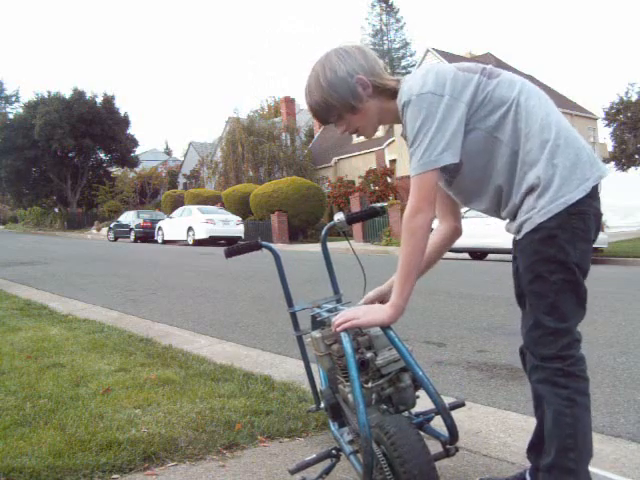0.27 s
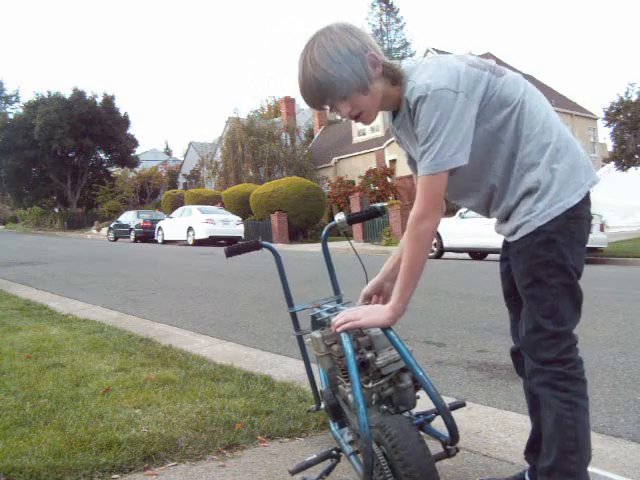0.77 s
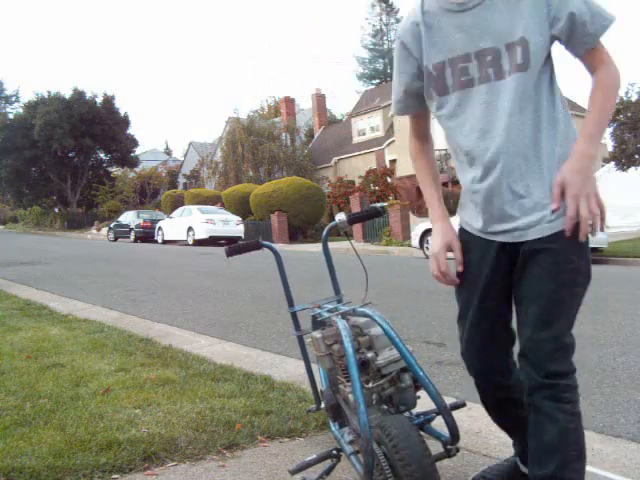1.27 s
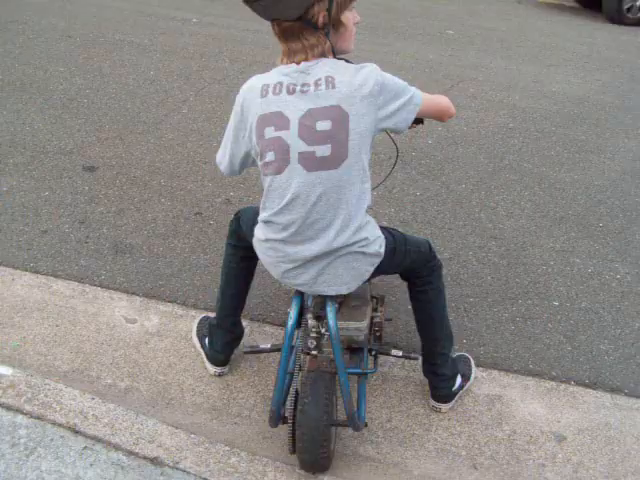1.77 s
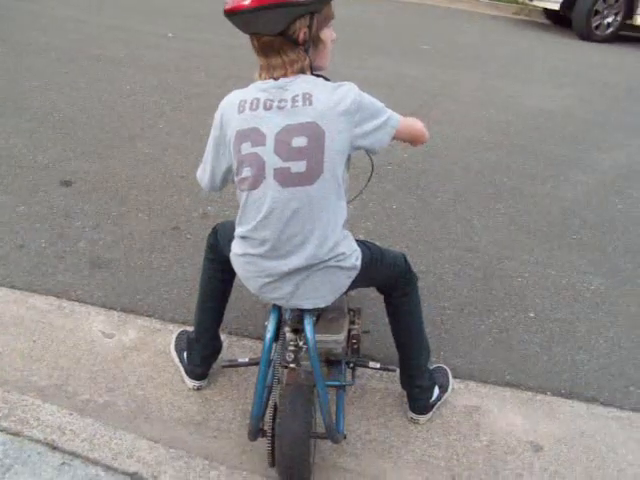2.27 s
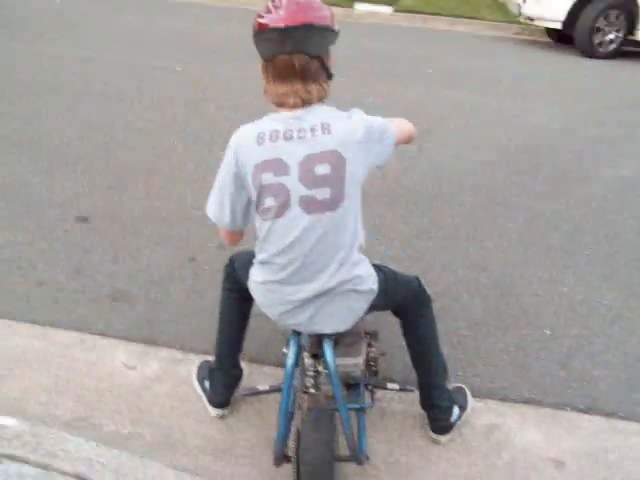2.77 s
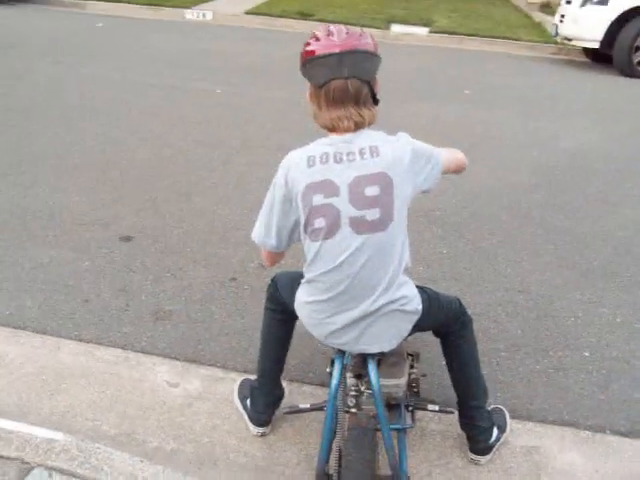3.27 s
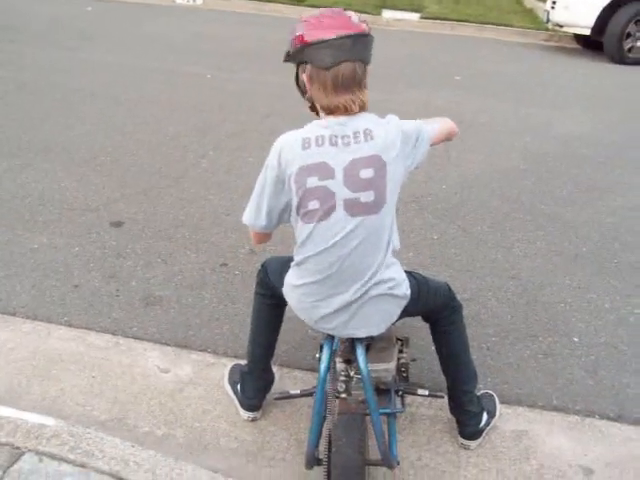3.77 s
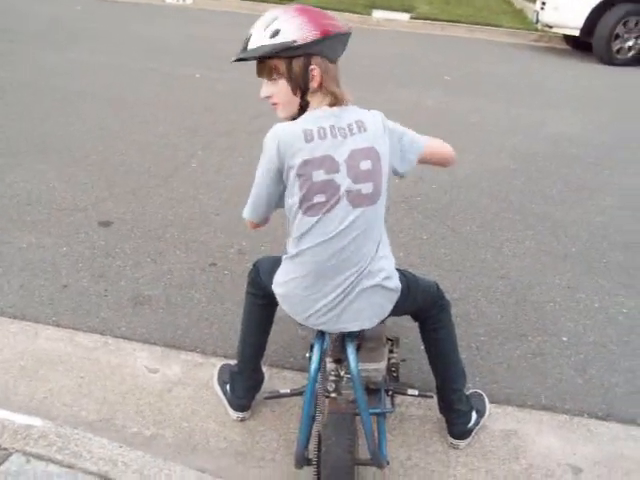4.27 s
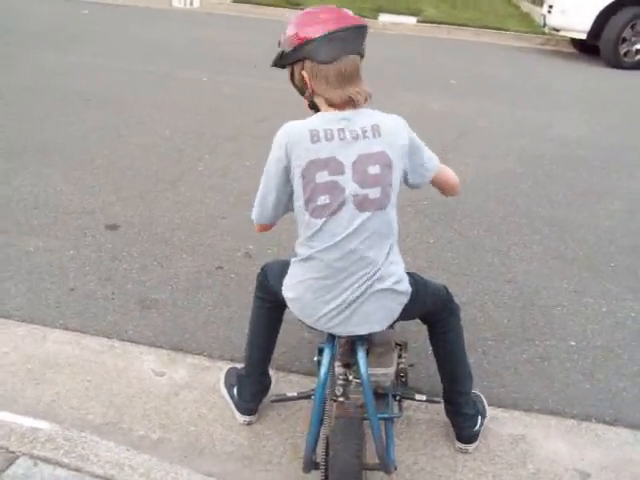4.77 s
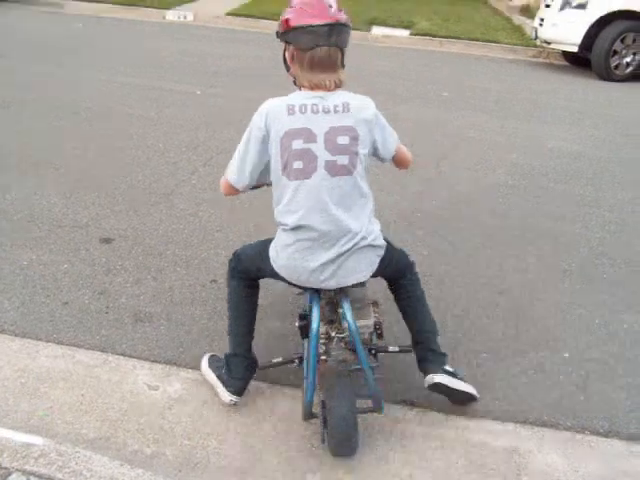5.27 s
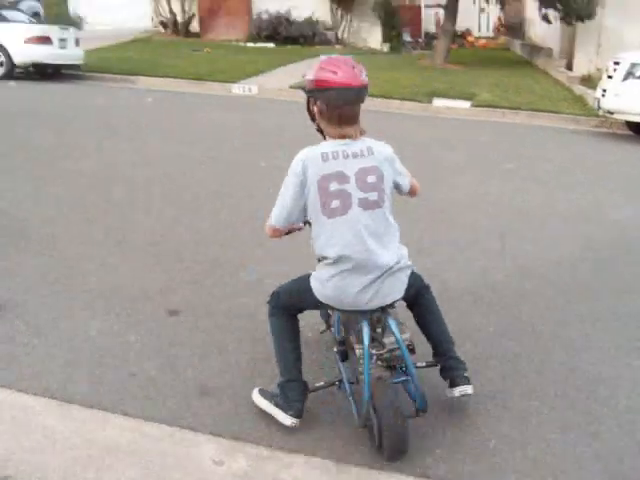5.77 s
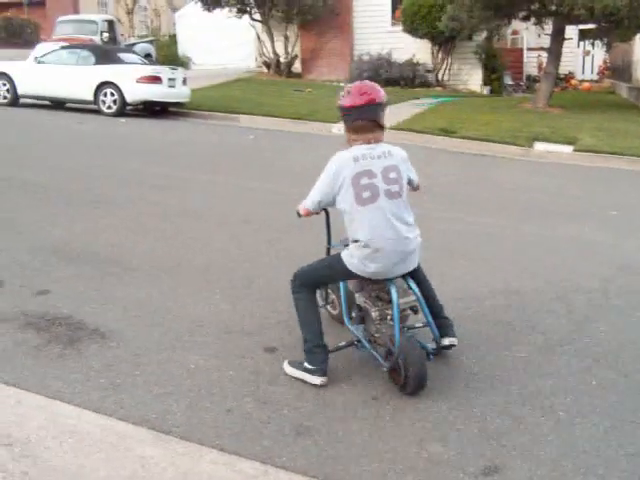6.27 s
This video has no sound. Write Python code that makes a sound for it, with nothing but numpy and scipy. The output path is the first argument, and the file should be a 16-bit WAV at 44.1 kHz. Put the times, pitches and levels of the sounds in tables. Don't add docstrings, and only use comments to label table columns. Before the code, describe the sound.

A little motorbike engine chugs beside the microphone, each beat a thump, crack and hiss of gas over clattering metal. It runs down, knocks and dies. Total silence for a moment, then a raspy idle heard from behind, rising revs, a weak beat or two, and a popping departure along the road. Gritty, compressed, dull-topped sound.

```python
import sys
import numpy as np
from scipy import signal
from scipy.fft import rfft, irfft, next_fast_len
from scipy.io import wavfile

SR = 44100
rng = np.random.default_rng(int(sys.argv[2]) if len(sys.argv) > 2 else 0)


def wrap_up_sound(samples):
    columns = np.atleast_2d(samples).T
    tamed = np.clip(columns, -1, 1)
    steps = np.round(tamed * 32767).astype(np.int16)
    wavfile.write(sys.argv[1], SR, steps)


def to_linear_factor(level_db):
    exponent = np.asarray(level_db, float) / 20
    return 10 ** exponent


N = 287973
TIME = np.arange(N) / SR


def rms_one(x):
    return x / np.sqrt(np.mean(x ** 2) + 1e-20)


def in_time(rows, s=TIME):
    at, *columns = np.transpose(rows)
    return [np.interp(s, at, column) for column in columns]


def add(out, start_s, piece):
    i = min(round(start_s * SR), N)
    out[max(i, 0):i + len(piece)] += piece[max(-i, 0):N - i]


def colour(x, spectrum):
    hz, level_db = np.transpose(spectrum)
    size = next_fast_len(len(x))
    log_hz = np.log(np.fft.rfftfreq(size, 1 / SR) + 1)
    gain = to_linear_factor(np.interp(log_hz, np.log(hz), level_db, left=-80, right=-80))
    return irfft(rfft(x, size) * rms_one(gain), size)[:len(x)]


def resonances(x, peaks):
    out = 0
    for k, (hz, width_hz, level_db) in enumerate(peaks):
        r = np.exp(-np.pi * max(width_hz, 5) / SR)
        poles = [1, -2 * r * np.cos(2 * np.pi * hz / SR), r * r]
        ringing = signal.lfilter([1, 0, -1], poles, x)
        out = out + (-1) ** k * to_linear_factor(level_db) * (1 - r * r) * ringing
    return rms_one(out)


def grains(per_s, spread_db):
    sizes = to_linear_factor(spread_db * np.minimum(rng.exponential(1, N), 4)) * rng.standard_normal(N)
    return rms_one(sizes * (rng.random(N) < per_s / SR) + 1e-9)


def flutter(rate_hz):
    band = signal.butter(2, [0.23 * rate_hz, rate_hz], "band", fs=SR, output="sos")
    return rms_one(signal.sosfilt(band, rng.standard_normal(N)))


def puff(rise_s, fall_s):
    t = np.arange(round(8 * (rise_s + fall_s) * SR)) / SR
    shape = (1 - np.exp(-(t / rise_s) ** 2)) * np.exp(-t / fall_s)
    return shape / shape.max()


def swell(width_s, rise_share):
    t = np.arange(-3 * width_s, 3 * width_s, 1 / SR)
    width = width_s * np.where(t < 0, rise_share, 1)
    return t[0], np.exp(-.5 * (t / width) ** 2)


# start and end in seconds, jet lead before the thump in cycles,
# jet width in cycles, crack width in seconds, valve delay after the thump in cycles.
VIEWS = [
    (0, 1.79, 0.13, 0.077, 0.0039, 0.23),
    (2.088, 4.77, 0.16, 0.068, 0.0015, 0.26),
    (4.77, 6.53, 0.17, 0.11, 0.0026, 0.43),
]


def by_view(make):
    out = np.zeros(N)
    for k, (start, end, *_) in enumerate(VIEWS):
        part = slice(round(start * SR), min(N, round(end * SR)))
        out[part] = make(k, part)
    return out


def view_at(s):
    return (s > VIEWS[0][1] + .1).astype(int) + (s > VIEWS[2][0])


# time of a beat in seconds, slowing as a share over the stretch ending
CRANK = [(.0098, 0), (0.6457, .05), (1.0658, .11), (1.472, .19), (1.614, 0), (2.096, 0), (2.8055, .055),
         (3.509, -.046), (4.061, -.14), (4.8039, .043), (5.169, -.095), (6.118, .001), (6.5183, .036)]
CYCLES = [11, 6, 4, 1, 1, 9, 9, 10, 13, 8, 22, 9]


def beat_times():
    at = [CRANK[0][0]]
    for (start, _), (end, slowing), count in zip(CRANK, CRANK[1:], CYCLES):
        u = np.arange(1, count + 1) / count
        at.extend(start + (end - start) * (u + slowing * u * (u - 1)))
    return np.array(at)


# time in seconds, early gas jet in dB, crack in dB.
THROTTLE = [(0, -14, -15.5), (.65, -13, -13), (1.25, -14.5, -10.5), (1.61, -5.5, -22), (2.1, -16, -10.5),
            (2.4, -9, -12.5), (3.2, -5, -23), (3.45, -4, -9.5), (3.95, -5, -17), (4.05, -20, -15.5),
            (4.5, -21.5, -15), (4.75, -6.5, -2), (4.95, -7.5, -8), (5.3, -14, -9.5), (5.8, -13.5, -11.5),
            (6.2, -17, -7.5), (6.53, -15.5, -8.5)]
# time in seconds, thump change in dB.
MISFIRES = [
    (4.061, -13),
    (4.689, -11),
]
VALVE_DB = [-13, -18, -40]
SCATTER_DB = [1.0, 2.0, 1.8, 3.5]
JITTER_S = [.001, .0012, .0003]


def beats():
    at = beat_times()
    view = view_at(at)
    chance = np.clip(rng.standard_normal((len(at), 5)), -1.4, 1.4)
    weak_db = sum(db * (np.abs(at - s) < .02) for s, db in MISFIRES)
    means = [in_time(PIPE, at)[0] + weak_db, *in_time(THROTTLE, at), np.array(VALVE_DB)[view]]
    levels_db = np.transpose(means) + chance[:, :4] * SCATTER_DB
    return at + chance[:, 4] * np.array(JITTER_S)[view], levels_db


# frequency in Hz, level in dB per Hz.
RUMBLE = [(15, -54.5), (25, 4), (43, -17), (123, -3), (167, -4.5), (255, -5), (358, -11.5), (450, -10),
          (580, -48.5), (990, -120)]


def rumble():
    return colour(rng.standard_normal(N), RUMBLE)


# frequency in Hz, width in Hz, level in dB.
BELL = [(2594, 10, -6), (3521, 25, -18), (4290, 10, 0), (4603, 20, -12), (6019, 30, -12), (6315, 10, -8),
        (6605, 16, -9)]
# time in seconds, level in dB, swell in dB/s, hold in seconds, fade in dB/s.
RUBS = [
    (0, -18, 100, .08, 60),
    (3.69, -24, 120, .08, 45),
    (4.18, -20, 50, .11, 70),
]


def clutch_bell():
    contacts = grains(6000, 1)
    bell = by_view(lambda k, part: resonances(contacts[part], BELL if k else BELL[1:3]))
    rubbing = 0
    for s, level_db, up, hold_s, down in RUBS:
        before, after = np.maximum(s - TIME, 0), np.maximum(TIME - s - hold_s, 0)
        rubbing = rubbing + to_linear_factor(level_db - up * before - down * after)
    return rubbing * bell


# frequency in Hz, width in Hz, level in dB.
DRONES = [
    [(549.3, 33, 8.5), (892, 28, 5.5), (996, 14, -10.5), (1040, 650, -14.5), (1318, 10, 7), (1493, 65, 2.5),
     (1840, 270, -3.5)],
    [(541.4, 12, 5.5), (640, 295, -4.5), (1315, 69, 8), (1297, 152, 6), (1932, 160, -4)],
    [(640, 580, -0.5), (1390, 370, -1), (1810, 580, -11)],
]


def drone(lumps_db):
    shake = to_linear_factor(.7 * lumps_db) * grains(4000, 1.8)
    return by_view(lambda k, part: resonances(shake[part], DRONES[k]))


# frequency in Hz, width in Hz, level in dB.
CASINGS = [
    [(3130, 420, 26), (4550, 320, 12.5), (6217, 140, 19.5), (6600, 190, -56.5)],
    [(3000, 540, 2.5), (3770, 310, -2), (4520, 98, 4.5), (4560, 260, -6.5), (5850, 110, -5.5),
     (6470, 62, -7.5)],
    [(2070, 55, 0.5), (3500, 1300, 0), (4200, 110, 1), (3880, 900, 0.5), (6000, 500, -32.5)],
]


def rattle(lumps_db, limit_db):
    hail = to_linear_factor(lumps_db) * grains(9000, 1.5)

    def one_view(k, part):
        return resonances(hail[part], CASINGS[k]) + 1.45 * colour(hail[part][::-1], JETS[k])

    whole = by_view(one_view)
    body = signal.sosfiltfilt(signal.butter(3, 5000, fs=SR, output="sos"), whole)
    beats_per_s = np.interp(TIME, beat_times(), 1 / np.gradient(beat_times()))
    bright_db = np.clip(6 * (beats_per_s - 14.54), -12, limit_db)
    return body + to_linear_factor(bright_db) * (whole - body)


# time in seconds, level in dB.
SHAKE = [(0, -20), (.25, -21.5), (.45, -21), (1.19, -17), (1.62, -21.5), (2.33, -25), (2.98, -23),
         (3.48, -19), (3.76, -24.5), (3.92, -24), (4.18, -23), (4.68, -20), (4.82, -25), (5.12, -27.5),
         (5.7, -31), (6.16, -28), (6.53, -28)]
# rattle in dB, drone in dB, rumble in dB, lumpiness in dB,
# limit of fin brightness in dB.
MACHINE = [
    (-.1, -7, -13.5, 3, 8.5),
    (-.1, -2, -14, 2.5, 4),
    (-.1, -4, -12.5, -1.2, -3),
]
THROB_DB = [4.0, 3.0, 2.0]
THROB_AT = [.12, .1, -.05]


def machine():
    view, at = view_at(TIME), beat_times()
    cycle = np.interp(TIME, at, np.arange(len(at))) - np.array(THROB_AT)[view]
    throb_db = np.array(THROB_DB)[view] * np.cos(2 * np.pi * cycle)
    rattle_db, drone_db, rumble_db, lumpy_db, limit_db = np.array(MACHINE)[view].T
    lumps_db = lumpy_db * flutter(70)
    shaken = to_linear_factor(rattle_db + throb_db - 4.5) * rattle(lumps_db, limit_db)
    shaken = shaken + to_linear_factor(drone_db - 1.0) * drone(lumps_db)
    shaken = shaken + to_linear_factor(rumble_db + 1.0) * rumble()
    return clutch_bell() + to_linear_factor(in_time(SHAKE)[0]) * shaken


# time in
# seconds, peak in dB.
KNOCKS = [(1.32, 4), (1.379, -1.5), (1.442, 5.5), (1.5, -23), (1.529, -3.5), (1.565, 4.5), (1.575, -0.5),
          (1.635, -5), (1.655, -3.5), (1.685, -4.5), (1.728, -15), (1.745, 12), (1.756, 3.5), (1.784, 9),
          (2.389, -15), (2.433, 5.5), (2.51, 6), (3.182, 1), (3.334, 2), (3.491, 3)]


def knocks():
    blows = np.zeros(N)
    for s, peak_db in KNOCKS:
        add(blows, s, to_linear_factor(peak_db - 15.0) * puff(0.0026, 0.0031))
    dulled = signal.lfilter(*signal.butter(2, 5200, fs=SR), blows * rng.standard_normal(N))
    metal = [(1294, 2700, -14.0), (3880, 140, -4), (6060, 800, -28.0)]   # Hz, width Hz, dB
    return resonances(dulled, metal) * np.sqrt(np.mean(blows ** 2))


# frequency in Hz, width in Hz, level in dB.
FRAMES = [
    [(70, 8, 2), (285, 9, 0), (550, 10, -7)],
    [(110, 30, 0), (270, 30, -4)],
    [(254, 10, -2), (200, 30, -5), (130, 40, -10), (300, 14, -10), (627, 14, -3), (740, 30, -4),
     (860, 30, -5)],
]
# time in seconds, level in dB.
FRAME_LEVEL = [(0, -50), (.9, -44), (1.05, -33), (1.79, -28), (2.09, -42), (4.7, -42), (4.9, -34),
               (6.53, -33)]


def frame(at):
    kicks = np.full(N, 1e-12)
    for s in [*at, 1.715]:
        add(kicks, s, np.ones(1))
    ringing = by_view(lambda k, part: resonances(kicks[part], FRAMES[k]))
    return to_linear_factor(in_time(FRAME_LEVEL)[0]) * ringing


# frequency in Hz, level in dB per Hz.
JETS = [
    [(470, -38.5), (800, -7), (999, 1.5), (1110, -2.5), (2020, -9), (2290, -3.5), (3900, 4.5), (4430, 2.5),
     (4970, -5), (5860, -6), (8060, -22), (10500, -67), (17700, -120)],
    [(590, -9), (1000, -14.5), (1270, -8.5), (1620, -9), (1940, -9), (2460, -13), (3740, -4), (4110, -7),
     (6420, -10.5), (7520, -19), (8060, -16.5), (10500, -67), (17700, -120)],
    [(650, -13), (1100, -15), (1250, -14.5), (2180, -13), (2390, -13.5), (3120, -1.5), (3590, -1.5),
     (3970, -9), (6650, -14.5), (7420, -21), (8060, -29), (10500, -78), (17700, -120)],
]


def gas_and_valves(at, levels_db):
    periods = np.clip(np.gradient(at), .04, .14)
    troughs = in_time(OUTFLOW, at)[1]
    flow, clatter = np.zeros(N), np.zeros(N)
    for s, levels, period, trough, view in zip(at, levels_db, periods, troughs, view_at(at)):
        _, jet_db, crack_db, valve_db = levels
        _, _, lead, length, crack_s, valve = VIEWS[view]
        bursts = [(flow, s - lead * period, length * period, jet_db - 3.5),
                  (flow, s + trough + 0.00099, crack_s, crack_db - 1.5),
                  (clatter, s + valve * period, .06 * period, valve_db - 2.5)]
        for out, centre, width_s, level_db in bursts:
            early, shape = swell(width_s, rise_share=.35)
            add(out, centre + early, to_linear_factor(level_db) * shape)
    drive = flow * grains(20000, 1.2) + clatter * grains(12000, 1.5)
    return by_view(lambda k, part: colour(drive[part], JETS[k]))


# time in seconds, thump in dB, low mode in Hz, its 60 dB decay in seconds,
# third mode in dB.
PIPE = [(0, 6, 231, 0.02, -34.5), (.66, -1, 237, 0.012, -25.5), (.7, -9.5, 139, 0.0097, -24.5),
        (1.62, -10, 113.6, 0.013, -35), (2.09, -16, 187.5, 0.034, -4.5), (3.0, -13.5, 175, 0.019, -.5),
        (3.449, -14.5, 160, 0.013, -6), (3.8, -18, 195, 0.028, -3.5), (4.05, -22, 202, 0.04, 1),
        (4.5, -18, 189, 0.04, 0), (4.851, -23, 179, 0.018, 6), (5.7, -27.5, 181, 0.018, 3.5),
        (6.53, -20.5, 189.5, 0.01, -5.5)]
# time in seconds, third mode in Hz, pressure trough after the beat in seconds,
# swell in seconds.
OUTFLOW = [(0, 640, 0.0043, 0.012), (0.661, 640, 0.0023, 0.0031), (.7, 490, -.001, 0.00099),
           (1.62, 528, -.003, 0.0012), (2.09, 615, -0.0028, 0.0018), (4.7, 690, -.0022, 0.0014),
           (4.851, 658, -0.0013, 0.0016), (6.53, 627, -0.001, 0.0012)]


def pipe(at, thumps_db):
    out, t = np.zeros(N), np.arange(-.006, .07, 1 / SR)
    chance = rng.standard_normal((len(at), 2)) * [.01, 1]
    for s, thump_db, (pitch, third) in zip(at, thumps_db, chance):
        _, low_hz, t60, third_db = in_time(PIPE, s)
        third_hz, trough, rise = in_time(OUTFLOW, s)
        bend = 1.0 + pitch + 26 * np.maximum(t, 0)
        low_in, high_in = np.maximum(t + rise, 0), np.maximum(t + .0028, 0)
        low = np.cos(2 * np.pi * low_hz * bend * t) * to_linear_factor(-60 * low_in / t60)
        low = low * (1 - np.exp(-(low_in / (.7 * rise)) ** 2))
        high = np.cos(2 * np.pi * third_hz * t) * to_linear_factor(third_db + third - 60 * high_in / .021)
        high = high * (1 - np.exp(-high_in / .001))
        add(out, s + trough + t[0], -to_linear_factor(thump_db + 11) * (low + high))
    return signal.sosfilt(signal.butter(2, 75, "high", fs=SR, output="sos"), out)


def tank_reflection(near):
    notch_hz, width_hz = 4914, 530
    return signal.lfilter(*signal.iirnotch(notch_hz, notch_hz / width_hz, fs=SR), near)


def road_echo(near):
    leaving = VIEWS[2][0]
    delay_s = .00056 - .00015 * (TIME - leaving)
    dull = signal.lfilter(*signal.butter(2, 1800, fs=SR), near)
    return to_linear_factor(-7) * np.interp(TIME - delay_s, TIME, dull) * (TIME > leaving)


SILENT = (1.789, 2.087)
# time in seconds, level in dB.
FADE_IN = [
    (2.087, -13),
    (2.2, -9),
    (2.33, 1),
]


def scene():
    at, levels_db = beats()
    near = machine() + knocks() + frame(at) + gas_and_valves(at, levels_db) + pipe(at, levels_db[:, 0])
    near = np.where(TIME < SILENT[0], tank_reflection(near), near)
    heard = (TIME < SILENT[0]) + (TIME > SILENT[1]) * to_linear_factor(in_time(FADE_IN)[0])
    return ((near + road_echo(near)) * heard)[None]


def roll_off(x):
    return signal.sosfilt(signal.butter(12, 8210, fs=SR, output="sos"), x)


# time in seconds, depth in dB, recovery in seconds.
DUCKS = [
    (3.439, -9.5, 0.041),
    (3.751, -6.5, 0.082),
    (4.811, -1.5, 0.02),
    (5.132, -5.5, 0.048),
]


def record(dry):
    thin = signal.sosfilt(signal.butter(2, 45, "high", fs=SR, output="sos"), dry)
    keep = np.exp(-1 / (0.06 * SR))
    level_db = 10 * np.log10(signal.lfilter([1 - keep], [1, -keep], thin ** 2) + 1e-12)
    squeeze_db, squeeze_share = -27, 0.18
    held = thin * to_linear_factor(-squeeze_share * np.maximum(level_db - squeeze_db, 0))
    for s, depth_db, back_s in DUCKS:
        held = held * to_linear_factor(depth_db * (TIME > s) * np.exp(-np.abs(TIME - s) / back_s))
    rounded = 1.25 * np.tanh(held / 1.25)
    narrow = signal.sosfilt(signal.cheby2(16, 60, 8420, fs=SR, output="sos"), rounded)
    mix = np.clip(narrow, -.995, .995)
    return roll_off(mix)


dry = scene()
out = record(dry)
wrap_up_sound(out)
```